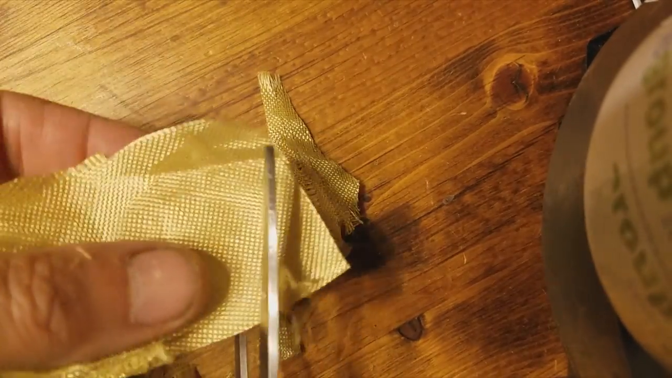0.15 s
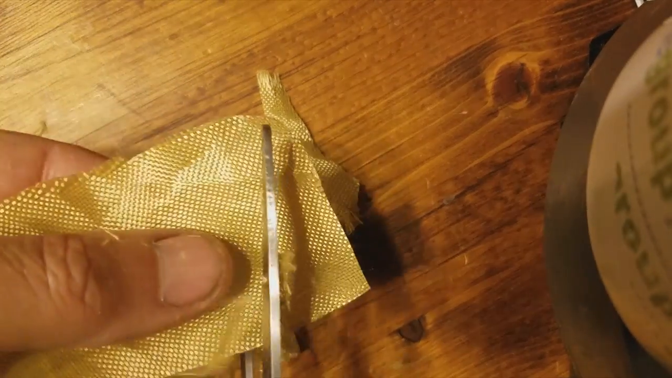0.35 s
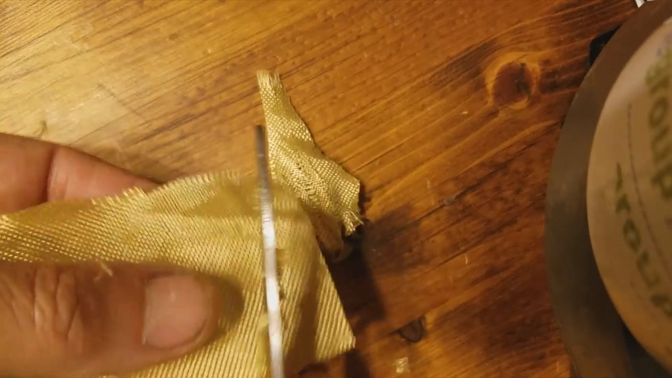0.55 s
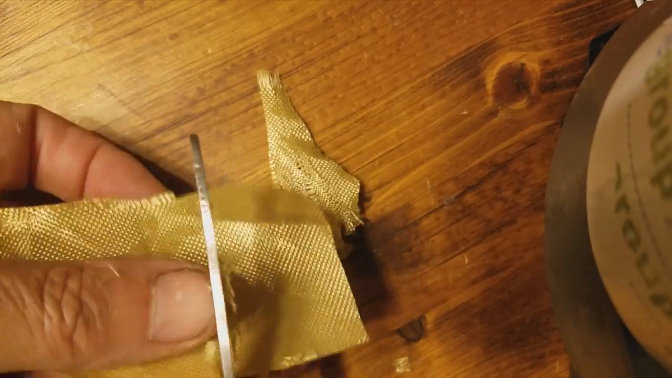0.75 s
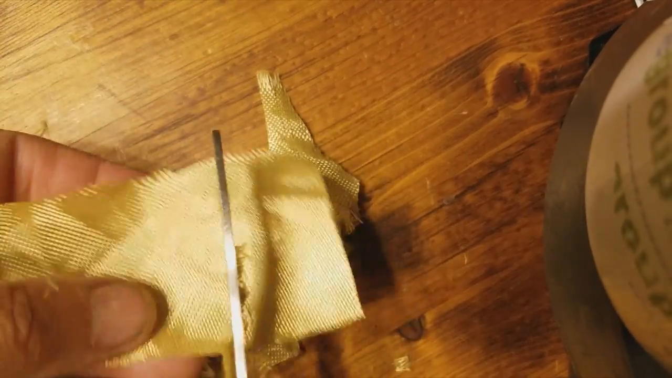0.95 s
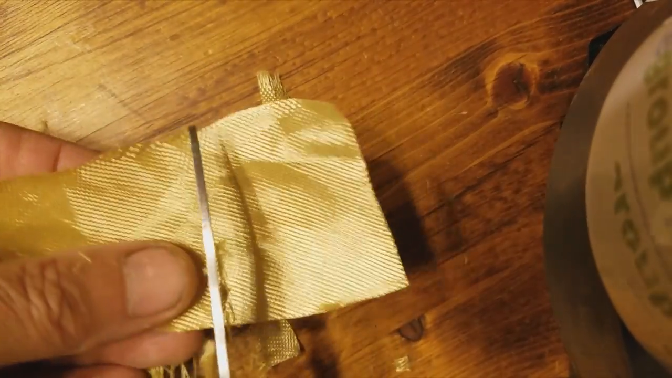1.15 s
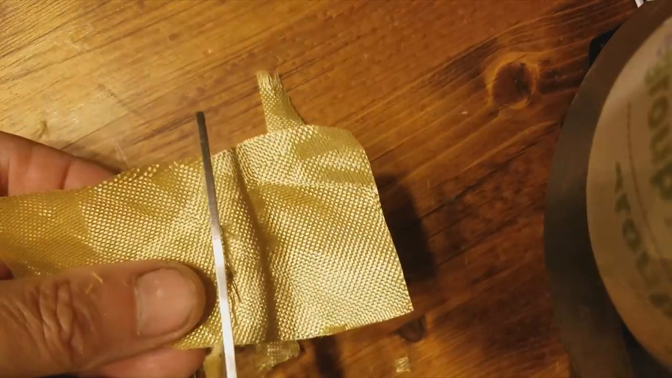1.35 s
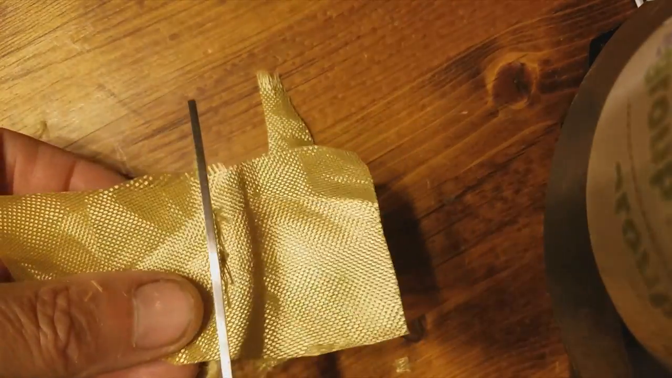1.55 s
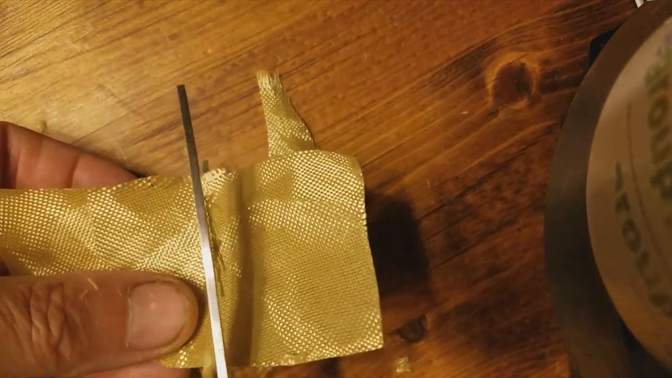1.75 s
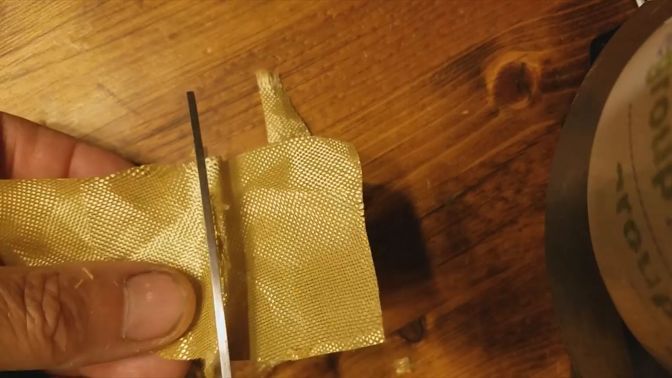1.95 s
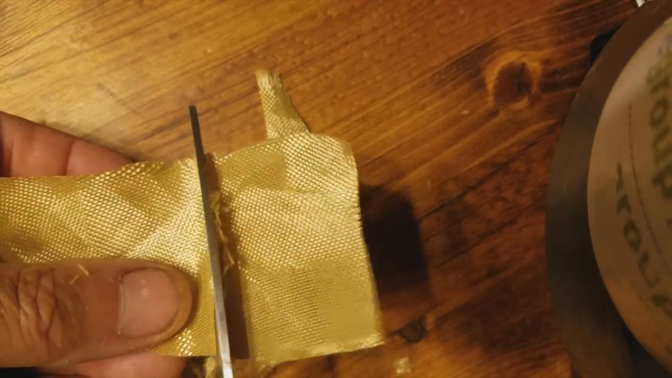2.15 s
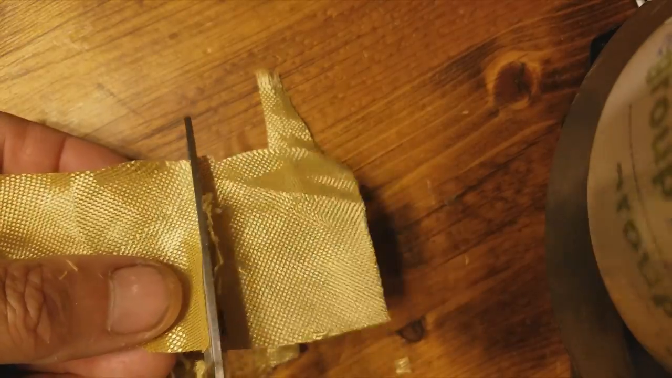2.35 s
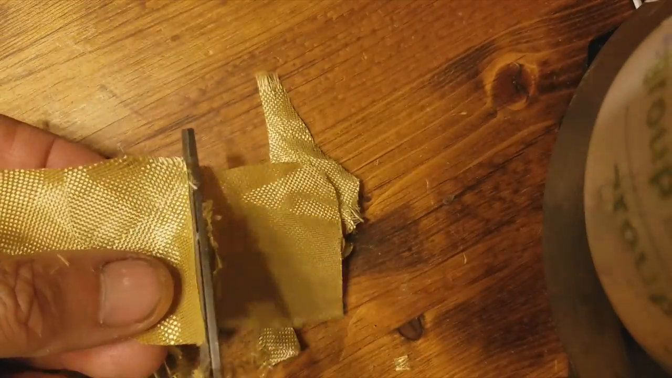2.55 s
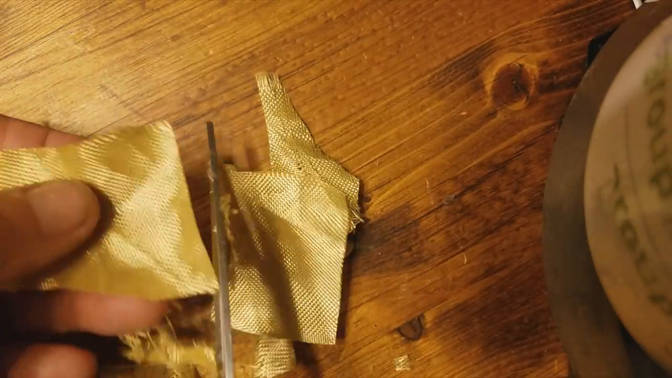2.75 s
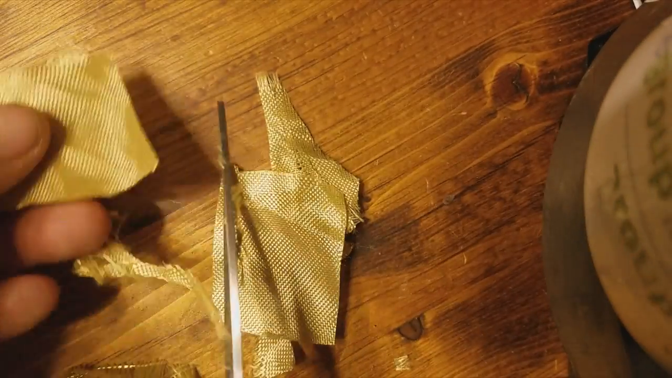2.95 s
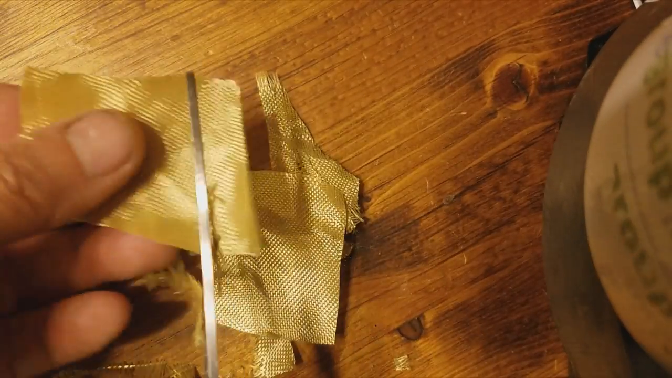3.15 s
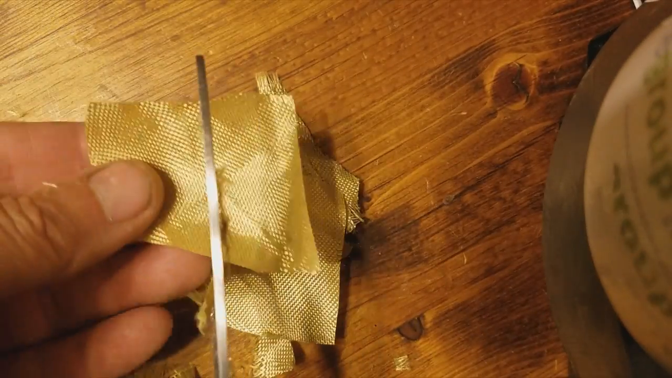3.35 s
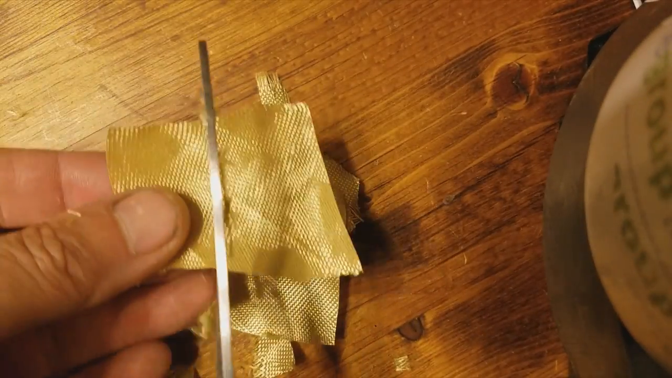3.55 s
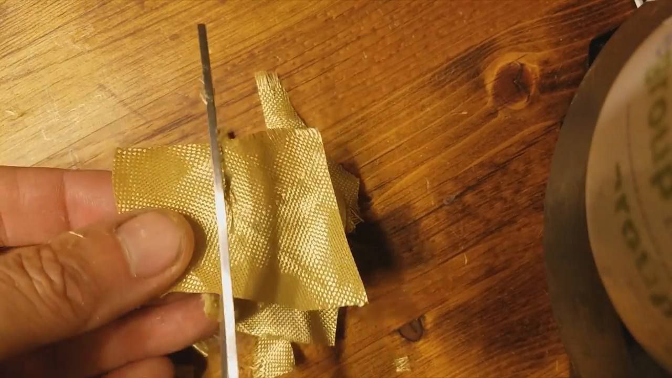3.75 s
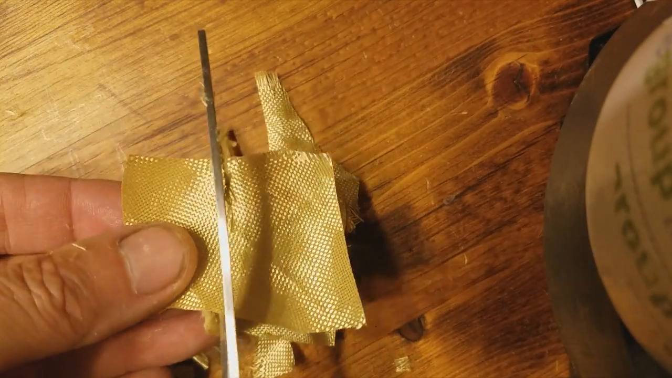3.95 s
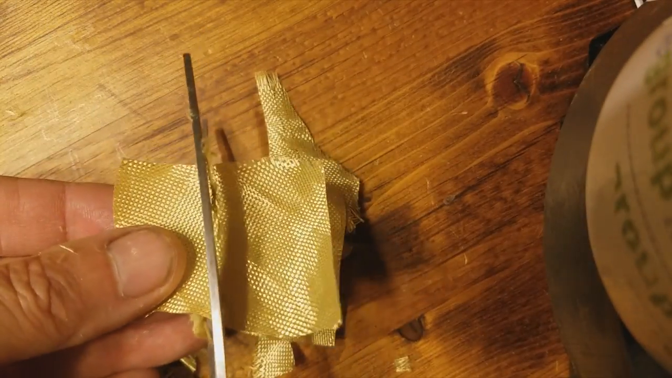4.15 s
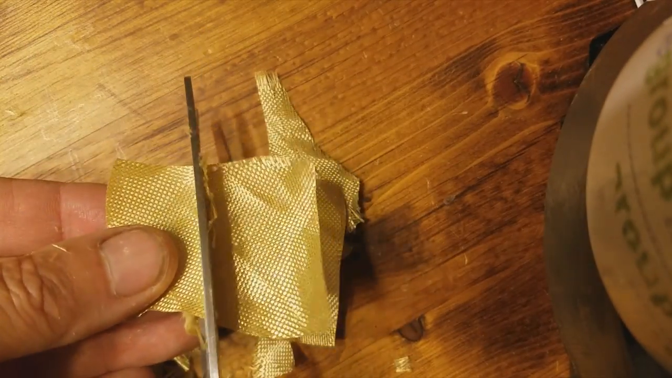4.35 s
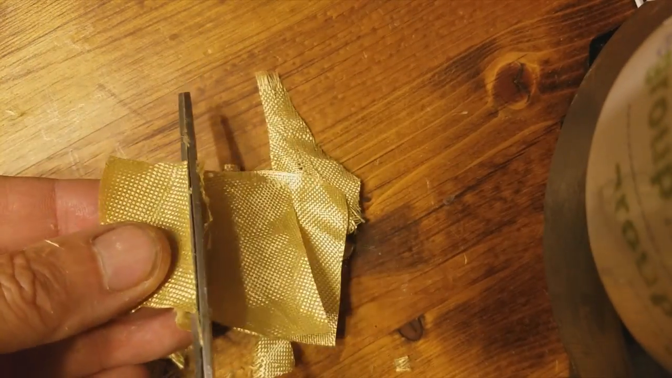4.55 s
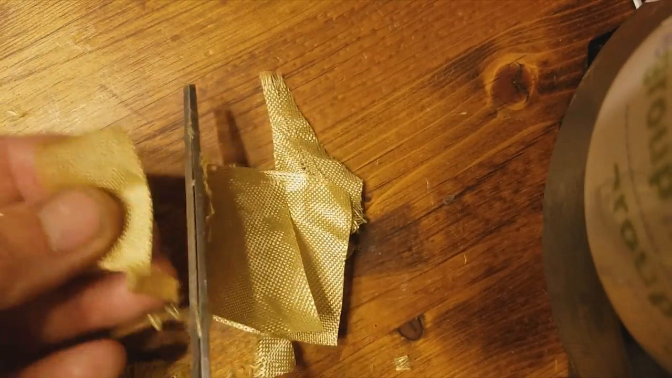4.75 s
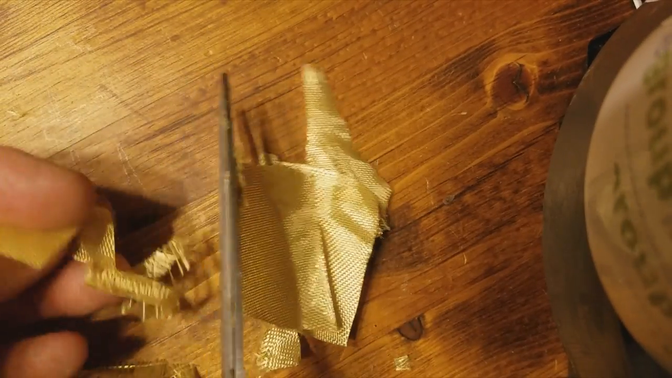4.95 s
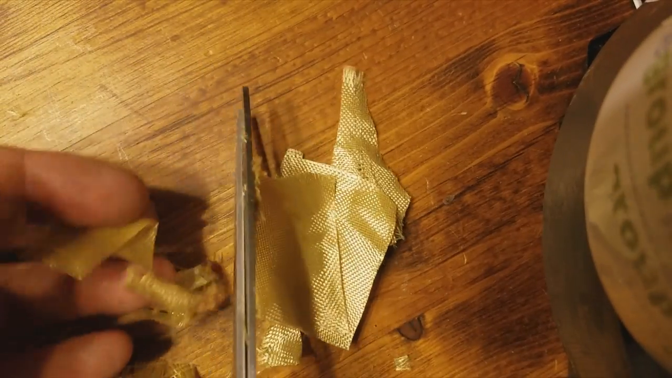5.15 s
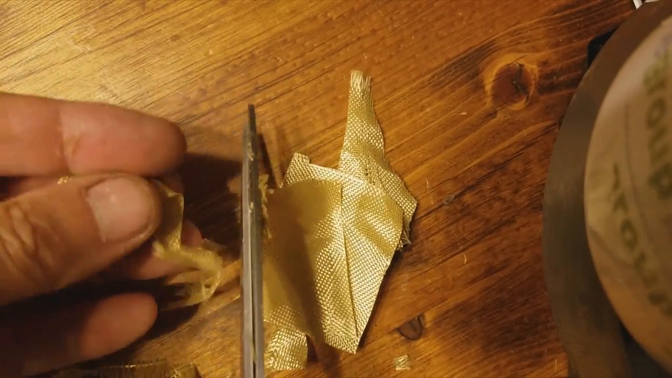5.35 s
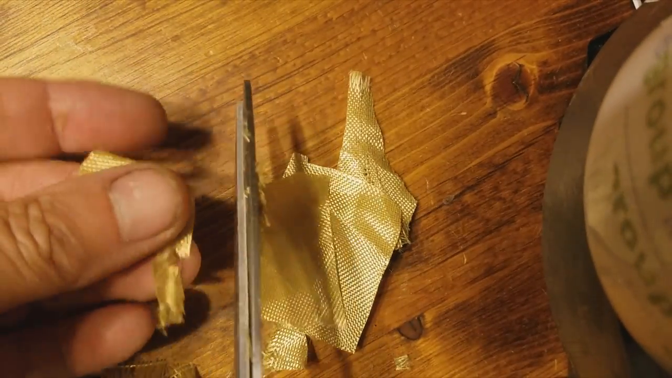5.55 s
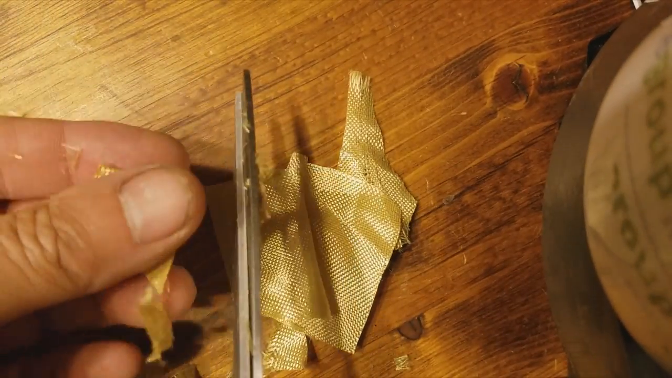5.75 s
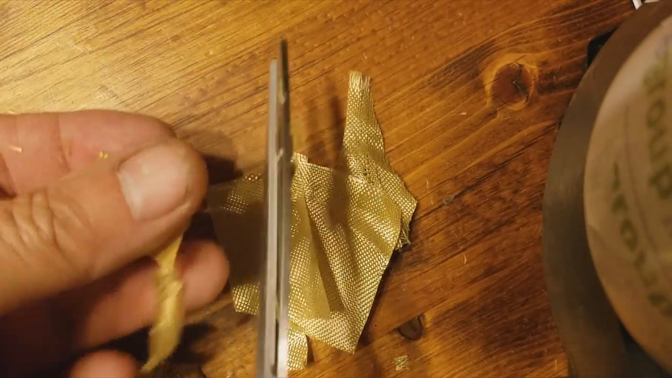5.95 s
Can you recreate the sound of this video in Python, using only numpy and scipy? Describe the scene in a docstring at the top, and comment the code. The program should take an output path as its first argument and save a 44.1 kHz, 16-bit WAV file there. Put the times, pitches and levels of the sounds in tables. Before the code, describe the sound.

Very close, in a quiet furnished room, thick cloth rustles in the fingers and bumps a wooden table softly. Scissors crunch through it in a gritty run that grows louder, then clack shut and clack again as they spring open. After a brief rustle, a second crunching cut ends with the same two bright clicks, then faint handling.

```python
"""Serrated scissors make two cuts through thick woven cloth, close above a wooden table in a quiet room.
Yarns crunch apart as clumped grains through blade and cloth resonances, over rasping grains and gliding
sine whistles. After each cut the blades clack shut, then clack again as they spring free: grain bursts
ringing the steel and thudding the handles. Cloth rustles throughout as swells of filtered grains;
falling chirps bump the table softly before the first cut. Soft noise and a faint hum lie behind."""
import sys
import numpy as np
from scipy import signal
from scipy.fft import rfft, irfft
from scipy.io import wavfile
from scipy.ndimage import uniform_filter1d

SR = 44100
rng = np.random.default_rng(int(sys.argv[2]) if len(sys.argv) > 2 else 0)


def unload_wav(signal):
    """Save mono or channel-first audio to the path in sys.argv[1] as 16-bit WAV at rate SR, clipped to [-1, 1]."""
    wavfile.write(
        sys.argv[1],
        SR,
        np.round(np.clip(np.atleast_2d(signal).T, -1, 1) * 32767).astype(np.int16),
    )


N = 264820
T = np.arange(N) / SR  # s

# Room air spectrum: f/Hz, relative density/dB
AIR_SPECTRUM = [(20, -8.5), (50, -6), (120, -6), (220, -11), (320, -9), (550, -16), (1100, -18),
                (2000, -20.5), (4500, -28), (7400, -31), (9000, -35), (13500, -29.5), (16000, -27)]
AIR_DB = -62

# Cloth sliding in the fingers, smooth swells: middle t/s, length/s, peak level/dB
RUSTLES = [(.04, .12, -61), (0.263, 0.085, -64), (0.743, 0.36, -68.5), (1.015, 0.11, -60.5),
           (1.61, .12, -66), (1.843, 0.073, -62.5), (2.69, 0.26, -62), (3.116, 0.52, -62.5),
           (3.787, 0.11, -64.5), (4.684, 0.34, -68), (4.858, 0.14, -62), (5.012, 0.075, -62),
           (5.136, 0.06, -60), (5.51, 0.42, -64.5)]
# Spectrum of threads brushing the fingers: f/Hz, relative density/dB
RUSTLE_SPECTRUM = [(100, -9.5), (1000, 3.5), (2500, 3.5), (4500, -3), (7400, 2), (8600, -11), (10500, -4.5),
                   (13500, 3.5), (16000, -8.5)]
GRIP_DB = -77  # faint brushing while the cloth is only held

# Opening blades dragging along the weave, one stroke: start t/s, end t/s, level/dB
DRAG = (1.385, 1.627, -57.5)
# Spectrum of the rippling weave: f/Hz, relative density/dB
WEAVE_SPECTRUM = [(180, -29), (300, -10), (405, -8), (603, -25), (656, -9), (1560, 1), (3640, -14),
                  (7080, -9.5), (8790, -24), (12300, -12.5), (16000, -18)]
DRAG_ATTACK_S, DRAG_RELEASE_S = 0.08, 0.04

# Soft bumps on the table: t/s, chirp level/dB
BUMPS = [(.005, -39), (0.1153, -40), (.362, -43.5), (0.586, -50.5)]

# Stray threads and light touches of steel:
# t/s, length/s, snap level/dB, crunch relative to snap/dB, crunch centre f/Hz
TICKS = [(.043, .005, -63, 9.5, 805), (.132, 0.0017, -64.5, 9, 700), (.392, 0.0016, -55, 3.5, 700),
         (.648, 0.0043, -61.5, 5.5, 500), (.934, 0.0047, -59, -5, 1500), (1.467, 0.0093, -64, 7, 1500),
         (1.627, 0.0037, -52.5, -1, 1610), (2.773, .016, -57, 4.5, 1500), (4.532, 0.019, -48, -4.5, 2200),
         (4.810, 0.0025, -52.5, 11, 1380), (5.124, .008, -55, -13, 3000), (5.395, 0.012, -58, -6, 1500),
         (5.951, 0.0017, -54, -19, 3000)]

# Blades shutting or springing free: hardest contact t/s, chatter length/s, level/dB,
# handle thud relative to steel/dB, ring f/Hz, ring relative to steel/dB
CLACKS = [(2.4898, .011, -24.5, -16, 6600, -21), (2.7348, 0.017, -25, -37, 6950, -8.5),
          (4.5185, .011, -25.5, -18.5, 6800, -7), (4.801, 0.013, -24, -29, 5800, -8.5)]
# Spectrum of clack contacts, before the blade resonances: f/Hz, relative density/dB
STEEL_SPECTRUM = [(200, -14.5), (1000, -9), (1700, -6), (2400, -1), (4000, 2.5), (5200, 1), (7000, 2),
                  (8600, -1), (10000, -1.5), (14000, -0.5), (16000, -6)]
# Dull thud of the handles, also the table scuff: f/Hz, relative density/dB
HANDLE_SPECTRUM = [(30, -17), (70, -5), (140, 0.5), (280, 0), (500, -17), (1000, 0), (2000, -10.5),
                   (5000, -18)]
# Blade resonances, damped by hand and cloth: centre f/Hz, width/Hz, relative level/dB
BLADE_RESONANCES = [(1250, 500, -3), (2200, 350, -1), (3150, 300, -1), (4050, 400, 0), (4980, 200, -2),
                    (5450, 120, -1), (6150, 150, -2), (7020, 110, 6), (7400, 500, 2), (10150, 550, -1),
                    (11200, 400, -4), (12300, 700, -2), (13650, 800, 0), (14900, 600, -2)]

# Closing strokes through the cloth: start t/s, end t/s, edge rasp level/dB,
# taut crunch relative to snap/dB, crunch centre at the last yarn f/Hz
CUTS = [(1.916, 2.483, -60, 1, 3430), (4.088, 4.52, -57.5, -2.5, 2360)]
RASP_ATTACK_S, RASP_RELEASE_S = 0.034, 0.058
# Edges whistling as they slide: start t/s, end t/s, first f/Hz, last f/Hz,
# level at WHISTLE_HZ, before the yarns gate it/dB
WHISTLES = [(1.945, 2.01, 7050, 7400, -48.5), (2.02, 2.11, 8700, 9700, -51),
            (2.153, 2.28, 11200, 15400, -44), (2.768, 2.784, 12500, 11000, -38),
            (4.10, 4.18, 15600, 14000, -53), (4.198, 4.229, 7000, 7500, -43),
            (4.312, 4.402, 10500, 15600, -42.5)]
WHISTLE_HZ, WHISTLE_DB_PER_OCTAVE, WHISTLE_FADE_S = 11000, 7.5, 0.0067  # higher is louder

# Yarns parting: t/s, length/s, snap level/dB
YARNS = [(1.922, 0.0093, -52.5), (1.949, 0.007, -44.5), (1.996, 0.015, -44.5), (2.026, 0.011, -42),
         (2.064, .012, -43.5), (2.091, 0.0069, -42), (2.107, .005, -48), (2.153, 0.01, -41.5),
         (2.185, .015, -43.5), (2.23, 0.014, -40.5), (2.255, 0.0095, -38.5), (2.289, 0.0098, -37.5),
         (2.345, 0.0091, -35), (2.369, 0.0042, -43), (2.388, 0.0043, -43.5), (2.424, .002, -46),
         (2.428, .011, -34), (2.464, 0.0041, -39), (2.479, .0023, -30.5), (4.113, 0.0027, -55),
         (4.12, .003, -52), (4.131, 0.0035, -50.5), (4.151, .005, -50), (4.162, 0.0084, -45.5),
         (4.176, 0.0075, -45.5), (4.194, 0.019, -41.5), (4.219, 0.016, -42), (4.255, 0.015, -42.5),
         (4.288, 0.0075, -43.5), (4.311, 0.017, -39), (4.341, .016, -39), (4.367, .016, -38),
         (4.388, 0.01, -37.5), (4.415, 0.0093, -36), (4.451, 0.011, -35), (4.488, 0.0051, -38.5),
         (4.51, .003, -39)]
# Bright snap of fibres, before the blade resonances: f/Hz, relative density/dB
SNAP_SPECTRUM = [(300, -5), (2000, -9.5), (4000, -1.5), (5500, -6.5), (7200, -3), (8500, -1), (10000, -2),
                 (12000, 2), (14000, 2), (16000, 5)]
# Body of the crunch: f/Hz, relative density/dB
CRUNCH_SPECTRUM = [(40, -10), (80, -2), (300, -1.1), (550, -7), (850, -0.5), (1400, -2), (2100, -1.5),
                   (3200, -10), (5000, -13.5), (16000, -28)]
SLACK_DB, TIGHTEN_S = -11, 0.082  # the cloth crunches less until the blades have pulled it taut
CLOTH_HZ, LAST_STRIP_S = 1164, 0.11  # its resonance climbs as the uncut strip runs out

TOP_HZ = 15900


def undb(db):
    """Decibels to gain."""
    return 10 ** (np.asarray(db) / 20)


def unit(x):
    """Scale to rms 1."""
    return x / np.sqrt(np.mean(x ** 2))


def lossless(response):
    """Scale to energy 1."""
    return response / np.sqrt(np.sum(response ** 2))


def add(out, s, x):
    """Mix x into out from time s."""
    i = max(int(s * SR), 0)
    out[i:i + len(x)] += x[:N - i]


def through(x, response):
    """Let x excite a response."""
    return signal.fftconvolve(x, response)[:len(x)]


def colour(points, size=4096):
    """Minimum-phase response with the given (Hz, dB) spectrum, so its energy comes early."""
    hz, db = np.transpose(points)
    bins = np.maximum(np.arange(size // 2 + 1) * SR / size, 1)
    gain = undb(np.interp(np.log(bins), np.log(hz), db))
    # folding the cepstrum forward makes the response causal
    cepstrum = irfft(np.log(gain))
    cepstrum[1:size // 2] *= 2
    cepstrum[size // 2 + 1:] = 0
    return lossless(irfft(np.exp(rfft(cepstrum))))


def mode(hz, t60, size=4096):
    """One fading resonance, weak far below and above its pitch; t60 is the seconds to fall 60 dB."""
    t = T[:size]
    ring = np.sin(2 * np.pi * hz * t) * np.exp(-np.log(1000) * t / t60)
    return lossless(np.diff(ring, prepend=0))


def swell(start, end, attack_s, release_s):
    """Gain that rises from start, holds until end, then dies away."""
    rise = np.clip((T - start) / attack_s, 0, 1)
    fall = np.clip(1 - (T - end) / release_s, 0, 1)
    return rise * fall


def walk(rate, size=32768):
    """Random wander around zero with rate new targets a second, rms 1."""
    return unit(np.interp(T * rate, np.arange(size), rng.standard_normal(size)))


def grains(rate, spread_db):
    """Tiny clicks of uneven size and either sign, about rate a second, rms 1."""
    sizes_db = spread_db * np.clip(rng.standard_normal(N), -2, 2)
    sizes = rng.choice([-1, 1], N) * undb(sizes_db)
    return unit(sizes * (rng.random(N) < rate / SR))


def background(hum_hz=743, hum_db=-75):
    """Soft room noise with a faint wavering hum."""
    air = unit(through(rng.standard_normal(N), colour(AIR_SPECTRUM))) * undb(AIR_DB)
    pitch = hum_hz + 4 * walk(25)
    hum = np.sin(2 * np.pi * np.cumsum(pitch) / SR)
    return air + undb(hum_db) * hum


def room(x, echo_db=-18.6, t60=0.12, build_s=0.0055):
    """Reflections from table and hands build up quickly and die away in a furnished room."""
    t = T[:SR // 2]
    envelope = (1 - np.exp(-t / build_s)) * np.exp(-np.log(1000) * t / t60)
    echoes = rng.standard_normal(len(t)) * envelope
    return x + undb(echo_db) * through(x, lossless(echoes))


def cloth():
    """Threads brush the fingers, and the weave ripples along the opening blades."""
    power = undb(GRIP_DB) ** 2
    for middle, length, db in RUSTLES:
        swelling = undb(db) * np.exp(-2 * ((T - middle) / length) ** 2)
        power = power + swelling ** 2
    brush = grains(7000, spread_db=5) * undb(1.76 * walk(40)) * np.sqrt(power)

    start, end, db = DRAG
    stroke = swell(start, end, DRAG_ATTACK_S, DRAG_RELEASE_S)
    drag = grains(5000, spread_db=8.5) * undb(db + 2 * walk(130)) * stroke
    return through(brush, colour(RUSTLE_SPECTRUM)) + through(drag, colour(WEAVE_SPECTRUM))


def bumps(start_hz=620, end_hz=115, glide_s=0.00335, fade_s=0.017,
          scuff_db=-13, scuff_s=0.0073, wobble=0.21):
    """Bending waves in the board arrive treble first: a quick falling chirp under a dull scuff."""
    out, t = np.zeros(N), T[:4096]
    hz = end_hz + (start_hz - end_hz) * np.exp(-t / glide_s)
    scuff = unit(through(grains(4000, spread_db=7), colour(HANDLE_SPECTRUM)))
    uneven = 1 + wobble * walk(400)
    for s, db in BUMPS:
        now = int(s * SR) + np.arange(len(t))
        phase = 2 * np.pi * np.cumsum(hz * uneven[now]) / SR
        chirp = -np.sin(phase) * np.exp(-t / fade_s)
        rub = undb(scuff_db) * scuff[now] * np.exp(-t / scuff_s)
        add(out, s, undb(db) * (chirp + rub))
    return out


def steel(points, valley_db=-12):
    """Response of the blade resonances to contacts with the given spectrum."""
    hz = np.arange(40, SR / 2, 20)
    power = undb(valley_db) ** 2  # floor between the resonances
    for centre, width, db in BLADE_RESONANCES:
        power = power + undb(db) ** 2 / (1 + (2 * (hz - centre) / width) ** 2)
    blade = colour(np.column_stack([hz, 10 * np.log10(power)]))
    return lossless(through(colour(points), blade))


def clacks(hit_db=-9, rebound_s=0.00363, rebound_depth=0.41, skirt=0.029):
    """The blades chatter over each other around one hard contact; steel rings and the handles thud."""
    out, scrape = np.zeros(N), grains(14000, spread_db=2.5)
    t = T[:8192] - T[1024]  # zero at the hardest contact
    blade, handle = steel(STEEL_SPECTRUM), colour(HANDLE_SPECTRUM)
    for s, length, db, thud_db, ring_hz, ring_db in CLACKS:
        pressure = np.exp(-(2 * t / length) ** 4) + skirt * np.exp(-(t / length) ** 2)
        contact = pressure * (1 + rebound_depth * np.cos(2 * np.pi * t / rebound_s))
        chatter = lossless(contact * np.roll(scrape, -int(s * SR))[:len(t)])
        force = chatter + undb(hit_db) * (t == 0)
        sound = lossless(through(force, blade))
        sound = sound + undb(ring_db) * lossless(through(force, mode(ring_hz, 0.0045)))
        sound = sound + undb(thud_db) * lossless(through(force, handle))
        add(out, s + t[0], lossless(sound) * np.sqrt(length * SR) * undb(db))
    return out


def edges():
    """Steel rasps on steel; its whistle mostly climbs as the crossing point runs toward the tips."""
    sliding = np.zeros(N)
    for start, end, db, *_ in CUTS:
        sliding += undb(db) * swell(start, end, RASP_ATTACK_S, RASP_RELEASE_S)
    rasp = sliding * grains(5000, spread_db=7.5) * undb(3 * walk(160))

    whistle = np.zeros(N)
    for start, end, first_hz, last_hz, db in WHISTLES:
        progress = np.clip((T - start) / (end - start), 0, 1)
        glide = first_hz * (last_hz / first_hz) ** progress
        pitch = glide * (1 + 0.022 * walk(3500) + 0.027 * walk(150))
        gain = undb(db + WHISTLE_DB_PER_OCTAVE * np.log2(glide / WHISTLE_HZ))
        gain = gain * swell(start, end, WHISTLE_FADE_S, WHISTLE_FADE_S)
        whistle += gain * np.sin(2 * np.pi * np.cumsum(pitch) / SR)

    # the blades jump forward whenever a yarn gives way, and the whistle grows
    moving = np.zeros(N)
    for s, length, *_ in YARNS:
        moving += (T > s) & (T < s + length)
    moving = uniform_filter1d(moving, size=128)
    bright_rasp = through(rasp, steel(SNAP_SPECTRUM))
    dull_rasp = undb(-4.5) * through(rasp, colour(CRUNCH_SPECTRUM))
    return bright_rasp + dull_rasp + whistle * (0.14 + 1.4 * moving)


def yarns():
    """Give each yarn its crunch: fuller once the cloth is taut, moving to the cut's last pitch."""
    events = []
    for s, length, db in YARNS:
        start, end, _, crunch_db, last_hz = min(CUTS, key=lambda cut: abs(s - cut[1]))
        slack = np.exp(-max(s - start, 0) / TIGHTEN_S)
        narrow = np.exp(-((end - s) / LAST_STRIP_S) ** 2)
        crunch_hz = CLOTH_HZ + (last_hz - CLOTH_HZ) * narrow
        events.append((s, length, db, crunch_db + SLACK_DB * slack, crunch_hz))
    return events


def crunches(events, edge_s, fibre_rate, clump_db, cloth_cycles=9, cloth_db=-0.5):
    """Fibres of a yarn snap in clumps against the steel; the taut cloth resonates briefly."""
    clumps = undb(clump_db * walk(900))
    fibres = [clumps * grains(fibre_rate, spread_db=4.5) for _ in range(3)]
    out, t = np.zeros(N), T[:2048]
    snap_response, body = steel(SNAP_SPECTRUM), colour(CRUNCH_SPECTRUM)
    for s, length, db, crunch_db, crunch_hz in events:
        bite = (1 - np.exp(-t / edge_s)) * np.exp(-np.maximum(t - length, 0) / edge_s)
        # three independent grain streams drive steel, crunch body and cloth
        cut, tug, flap = (bite * stream[int(s * SR):][:len(t)] for stream in fibres)
        snap = lossless(through(cut, snap_response))
        taut = lossless(through(flap, mode(crunch_hz, cloth_cycles / crunch_hz)))
        crunch = lossless(lossless(through(tug, body)) + undb(cloth_db) * taut)
        sound = snap + undb(crunch_db) * crunch
        add(out, s, sound * np.sqrt(length * SR) * undb(db))
    return out


def scene():
    """Scissors, cloth and table in the room, over the background."""
    handling = cloth() + bumps() + crunches(TICKS, edge_s=0.00085, fibre_rate=5000, clump_db=1.5)
    cutting = clacks() + edges() + crunches(yarns(), edge_s=0.0013, fibre_rate=6000, clump_db=3.5)
    return (background() + room(cutting + handling))[None]


def record(dry):
    """The recorder cuts the top with a steep low-pass at TOP_HZ."""
    low_pass = signal.ellip(10, 0.2, 70, TOP_HZ, fs=SR, output="sos")
    return signal.sosfilt(low_pass, dry)


dry = scene()
out = record(dry)
unload_wav(out)
```